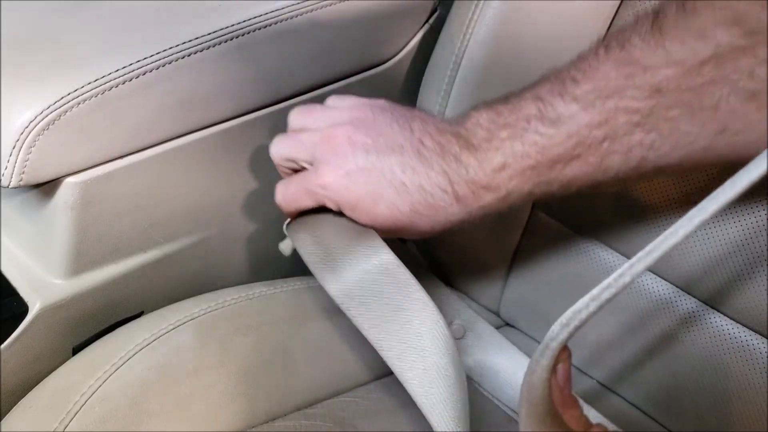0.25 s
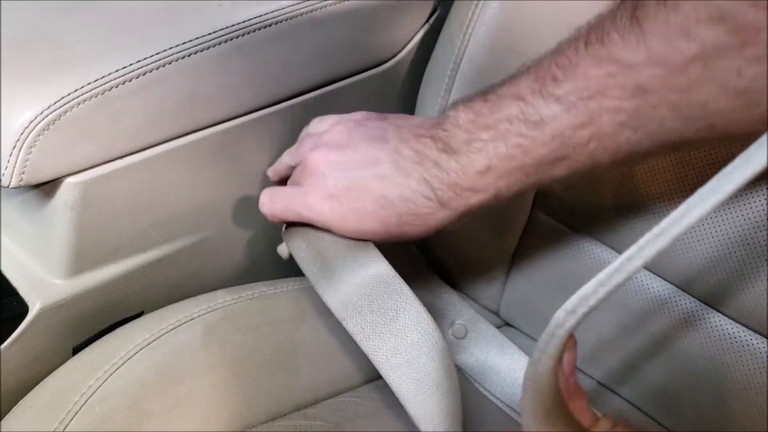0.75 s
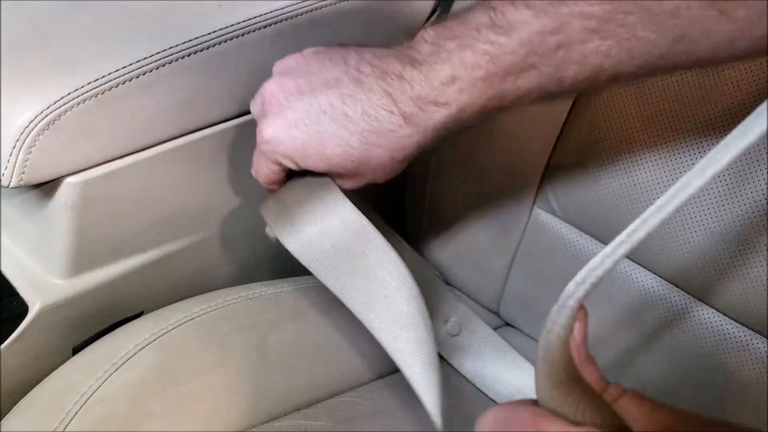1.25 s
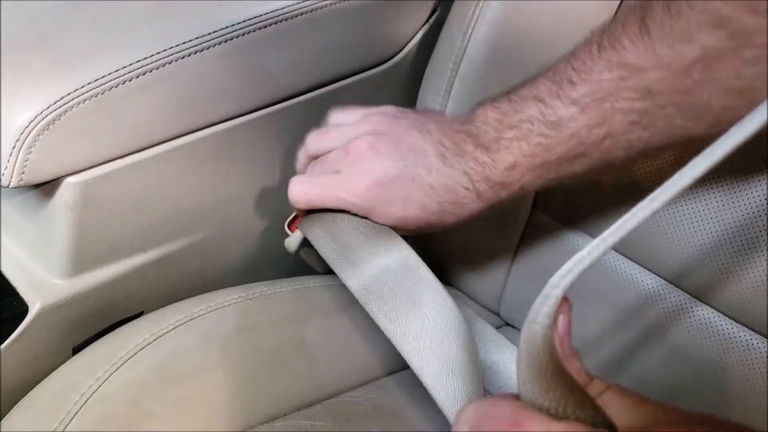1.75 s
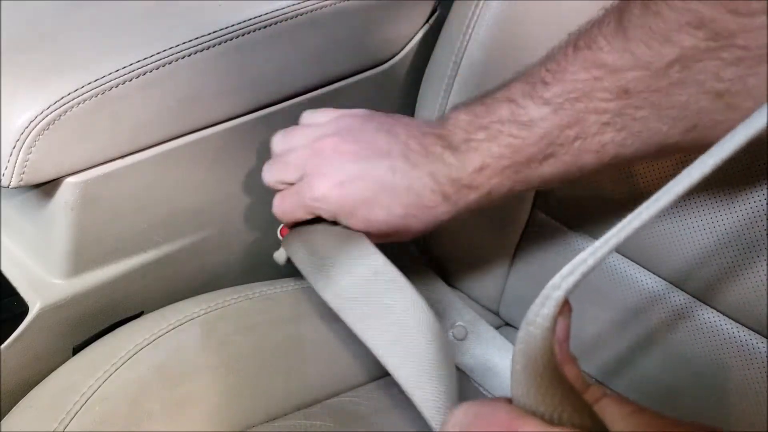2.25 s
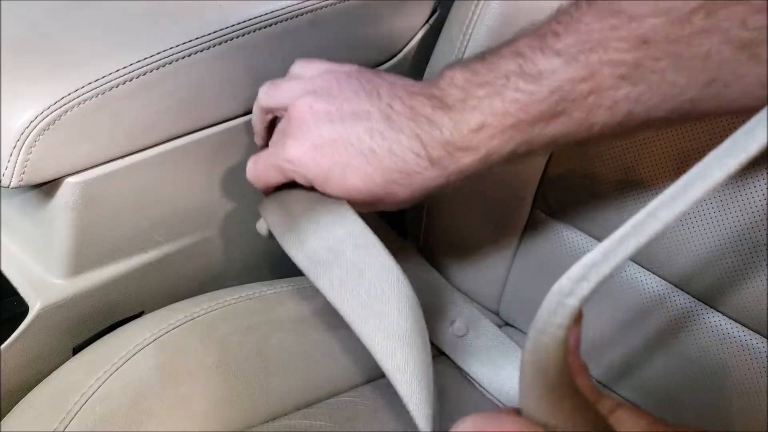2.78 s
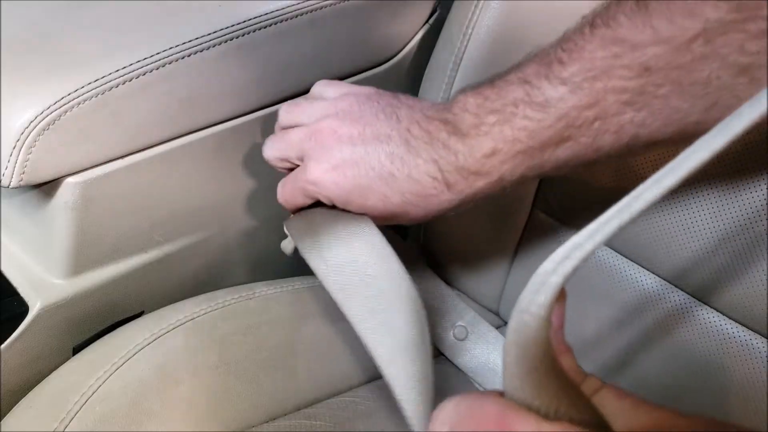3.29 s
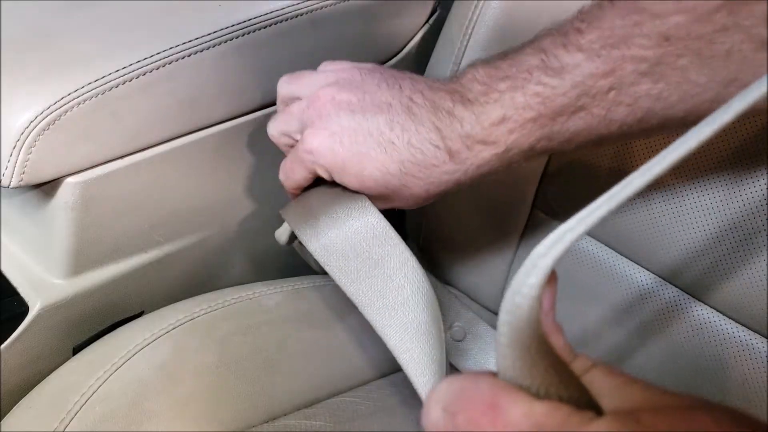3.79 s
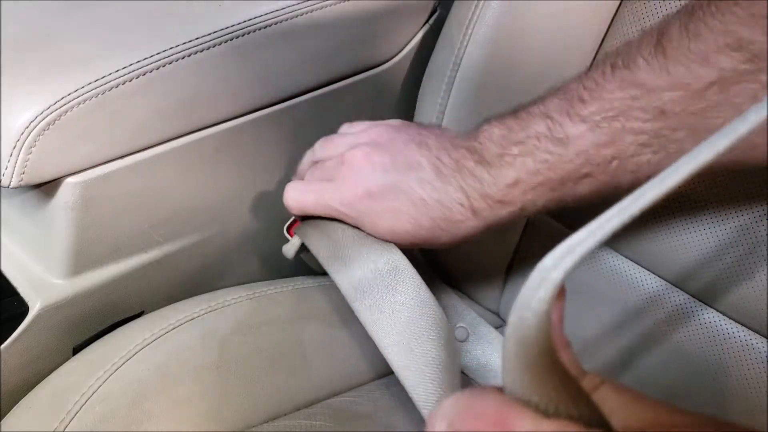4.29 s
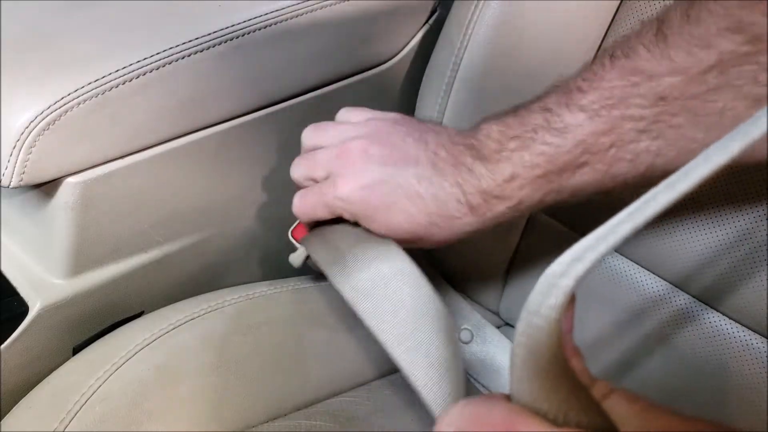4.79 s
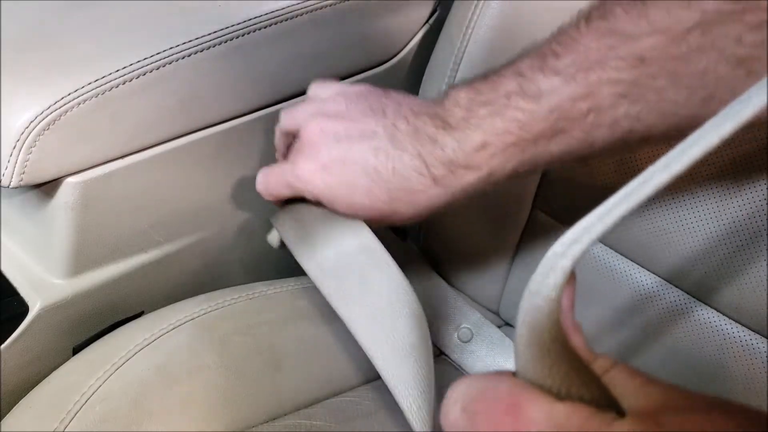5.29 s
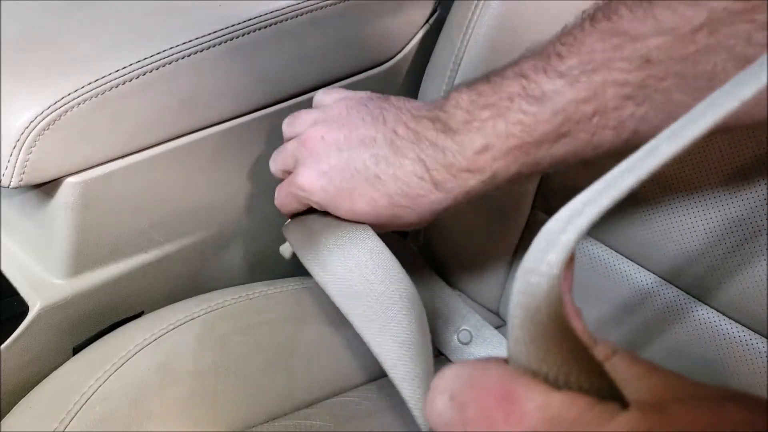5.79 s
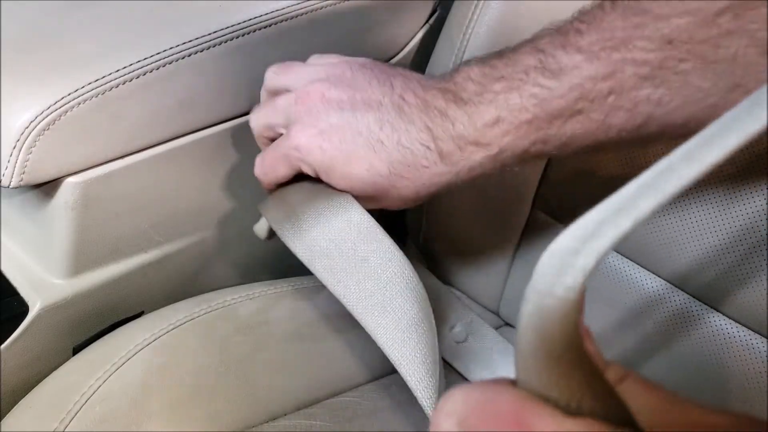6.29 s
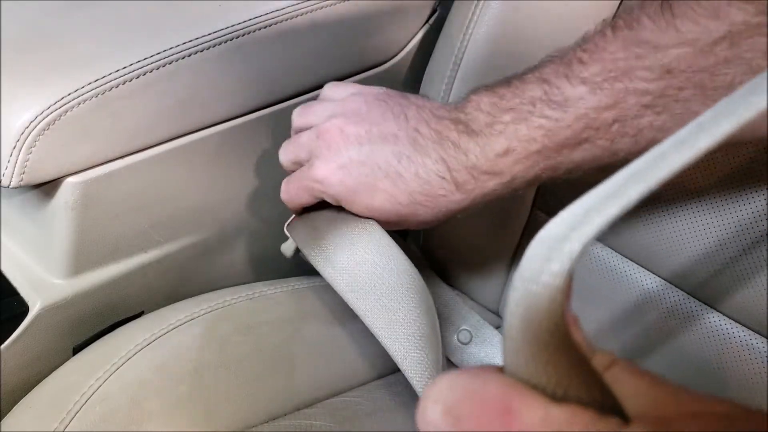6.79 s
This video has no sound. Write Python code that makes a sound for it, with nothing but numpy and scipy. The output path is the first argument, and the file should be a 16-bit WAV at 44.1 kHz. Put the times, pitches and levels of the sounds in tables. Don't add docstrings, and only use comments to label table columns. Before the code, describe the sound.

In a quiet parked car, heard very close in dry stereo slightly nearer on the left, a seat belt is fastened and freed eight times. A few dull taps and a webbing rub lead to the first sharp, bright snap at 0.34 seconds, with a rebound a few milliseconds later. A lighter button click follows at 0.54 and a hollow spring release at 0.76, then loose taps. Further snaps come at 1.43 (softest), 2.23, 3.08, 3.93, 4.76, 5.62 and 6.56, each followed by a press about 0.2 later and a release about 0.4 later; the 4.34 release is loudest. Strong scraping knocks precede the 4.76 snap, and a brief fabric rub accompanies 5.6. Low seat thuds and rumble follow the arm's shoves, calming while the hand holds still. Very faint metallic rings hang near 3.8, 4.8 and 6.9. The last release is at 6.97.

```python
import sys
import numpy as np
from scipy import signal
from scipy.fft import rfft, irfft, next_fast_len
from scipy.io import wavfile
from scipy.ndimage import uniform_filter1d, map_coordinates

SR = 44100
rng = np.random.default_rng(int(sys.argv[2]) if len(sys.argv) > 2 else 0)


def transcribe(u):
    v = np.clip(np.atleast_2d(u).T, -1, 1)
    q = np.round(v * 32767).astype(np.int16)
    wavfile.write(sys.argv[1], SR, q)


def rack_gain(trim_db):
    fader = np.asarray(trim_db, float)
    return 10 ** (fader / 20)


N = 310905

# t/s, peak level/dB, catch ahead/ms, catch level/dB, body level/dB
LATCHES = [
    (0.3389, -11.5, 6.9, -24.5, -6.5),
    (1.4343, -14, 8.1, -12.5, -10),
    (2.2342, -12, 4.8, -18.5, -2.5),
    (3.078, -11.5, 6, -20.5, 1),
    (3.9338, -10.5, 5.2, -20.5, -1),
    (4.7603, -10.5, 5.2, -15, -0.5),
    (5.6184, -13, 7.2, -17.5, -7.5),
    (6.558, -11, 7.4, -23.5, -2),
]
# t/s, peak level/dB, build-up/ms, body level/dB, shove level/dB
PRESSES = [
    (0.5427, -24, 2.7, 2, -53),
    (1.604, -25, 3.5, -1, -58.5),
    (2.4295, -25.5, 2.3, -1.5, -57),
    (3.267, -23, 3.45, 2.5, -57),
    (4.1159, -22, 3.9, 3.5, -51.5),
    (4.9777, -24, 3.2, 7, -57.5),
    (5.8076, -23, 2.9, 6, -53),
    (6.732, -20, 2.7, 4, -52.5),
]
# t/s, peak level/dB, pawl ahead/ms, pawl level/dB, brightness/dB
RELEASES = [
    (0.7577, -17.5, 11.2, -31, -0.6),
    (1.8024, -20.5, 12, -27, -0.8),
    (2.6389, -20.5, 11.3, -27, 0.5),
    (3.5267, -17, 16.3, -32, -1.2),
    (4.3434, -13, 9.9, -24, -3),
    (5.2186, -15.5, 9.4, -24.5, -3),
    (6.0747, -16, 8.9, -26, -1.5),
    (6.9724, -19.5, 14, -26.5, -0.3),
]


def unit(x):
    return x / np.sqrt(np.mean(x ** 2) + 1e-20)


def along(points, hz):
    f, v = np.transpose(points)
    return np.interp(np.log(hz + 1), np.log(f + 1), v)


def filtered(x, response):
    m = next_fast_len(N + SR // 2, True) // 2 * 2
    return irfft(rfft(x, m) * response(np.fft.rfftfreq(m, 1 / SR)), m)[..., :N]


def coloured(x, points):
    return filtered(x, lambda hz: rack_gain(along(points, hz)))


def causal(gain):
    cepstrum = irfft(np.log(gain + 1e-5))
    half = len(cepstrum) // 2
    cepstrum[1:half] *= 2
    cepstrum[half + 1:] = 0
    return np.exp(rfft(cepstrum)) / np.sqrt(np.mean(gain ** 2))


def resonant(modes, f):
    total = 0
    for k, (centre, width, db) in enumerate(modes):
        total = total + (-1) ** k * rack_gain(db) * 1j * f * width / (centre ** 2 - f * f + 1j * f * width)
    return total


def pair(alike, size):
    a, b = rng.standard_normal((2, size))
    angle = np.arccos(np.clip(alike, 0, 1)) / 2
    return np.array([np.cos(angle) * a + np.sin(angle) * b, np.cos(angle) * a - np.sin(angle) * b])


def wobble(rate):
    knots = rng.standard_normal(int(N * rate / SR) + 4)
    return map_coordinates(knots, [np.arange(N) * rate / SR])


def span(start_s, end_s, edge_s=0.046):
    now = np.arange(N) / SR
    return (np.tanh((now - start_s) / edge_s) - np.tanh((now - end_s) / edge_s)) / 2


def holding_still():
    settle_s = 0.074
    return sum(span(press[0] + settle_s, release[0]) for press, release in zip(PRESSES, RELEASES))


def seat_rumble(still):
    # f/Hz, level/dB
    rumble_colour = [(12, -44), (25, -15.5), (50, -5.5), (180, -5.5), (250, -13.5), (370, -10),
                     (560, -19.5), (800, -26.5), (1500, -31), (3000, -120)]
    starts = np.array([row[0] for row in [*LATCHES, *RELEASES]])
    after = np.maximum(np.arange(N) / SR - starts[:, None], 0)
    rise, fall = 1 - np.exp(-after / 0.0093), np.exp(-(after / 0.09) ** 2)
    load = np.sum(rise * fall, axis=0)
    low = coloured(rack_gain(3 * wobble(18)) * pair(0.7, N), rumble_colour)
    return rack_gain(-69.5 + 8.5 * load - 5.3 * still) * unit(low)


def webbing(still):
    # f/Hz, level/dB
    weave_colour = [(500, -28.5), (1500, -12), (2300, -4), (4500, -5.5), (7500, -5.5), (9200, -17.5),
                    (11500, -4), (13000, -14), (15800, -5.5)]
    # f/Hz, level/dB
    airy_colour = [(7000, -38), (9500, -13.5), (11500, 0.5), (13000, -5.5), (15800, -5)]
    # start t/s, length/s, slide level/dB, airy level/dB
    strokes = [(-0.1, 0.3, -67, -67), (1.414, .08, -73, -82), (1.83, 0.35, -70, -65.5),
               (2.249, 0.18, -65, -68.5), (3.95, 0.12, -74.5, -69), (4.139, 0.48, -79.5, -72.5),
               (4.6, 0.31, -75, -69), (5.341, 0.092, -71.5, -78), (5.597, 0.067, -49.5, -73),
               (6.158, 0.097, -75, -77.5), (6.434, 0.18, -67.5, -80), (6.57, 0.35, -79.5, -69)]
    slide, taut = sum(rack_gain(levels_db)[:, None] * span(s, s + length) for s, length, *levels_db in strokes)
    idle = rack_gain(-80 - 11.5 * still)
    grains = rack_gain(3 * wobble(48) + 1.2 * wobble(360)) * pair(0.21, N)
    rub = (idle + slide) * unit(coloured(grains, weave_colour))
    return rub + taut * rack_gain(1.5 * wobble(20)) * unit(coloured(pair(0.24, N), airy_colour))


def hand():
    still = holding_still()
    return webbing(still) + seat_rumble(still)


def shoves():
    # t/s, cushion level/dB, frame above the cushion/dB
    nudges = [(0.085, -63.5, -1), (0.226, -53, -9), (0.874, -54, -6), (0.929, -53, -9), (1.192, -56, -24),
              (1.261, -54.5, -3), (1.332, -55.5, -7), (1.878, -61.5, 0.5), (1.977, -62, -7),
              (2.754, -60.5, -8), (2.817, -49, -14), (2.999, -59.5, 0), (3.627, -58.5, -1),
              (3.718, -48, -9), (4.483, -56.5, -6.5), (4.636, -51, -6), (4.72, -47.5, 0), (5.342, -58.5, 1),
              (5.383, -57.5, -7), (5.492, -47, -3), (6.256, -56.5, -15), (6.412, -53, -10.5)]
    # t/s, cushion level/dB, frame above the cushion/dB
    thrusts = [
        (0.332, -45, -5),
        (1.416, -50, 6.5),
        (2.23, -44.5, 0),
        (3.072, -47, -1.5),
        (3.924, -45, 4.5),
        (4.758, -42, 0.5),
        (5.612, -43.5, 0.5),
        (6.548, -47.5, -4),
    ]
    heaves = [
        -42.5,
        -42,
        -45,
        -44.5,
        -42.5,
        -43.5,
        -39,
        -48,
    ]
    rows = [*nudges, *thrusts]
    rows += [(s, db, -10) for s, *_, db in PRESSES]
    ahead_s = 0.0027
    return rows + [(release[0] - ahead_s, db, -10) for release, db in zip(RELEASES, heaves)]


def seat():
    # f/Hz, width/Hz, level/dB
    cushion_modes = [(111, 18, -8), (183.7, 23.6, 2.5)]
    # f/Hz, width/Hz, level/dB
    frame_modes = [(325, 60, 1), (456, 76, -4), (521, 31, -6), (670, 130, -18)]
    t = np.arange(SR // 5) / SR
    soft, hard = np.zeros((2, 2, N + SR))
    for s, db, frame_db in shoves():
        start = round(s * SR)
        at = slice(start, start + len(t))
        soft[:, at] += rack_gain(db + 29 - 60 * t / 0.13) * (1 - np.exp(-t / 0.0063)) * pair(0.98, len(t))
        hard[:, at] += rack_gain(db + frame_db + 26.5 - 60 * t / 0.14) * (1 - np.exp(-t / 0.0014)) * pair(0.86, len(t))
    cushion = filtered(soft, lambda hz: resonant(cushion_modes, hz))
    return cushion + filtered(hard, lambda hz: resonant(frame_modes, hz))


def tongue():
    # t/s, f/Hz, level/dB, 60 dB decay/s
    rings = [
        (3.81, 4370, -68, 0.38),
        (4.829, 4520, -70, 0.94),
        (6.87, 4300, -71, 0.73),
    ]
    ringing = np.zeros(N)
    for s, hz, db, t60 in rings:
        t = np.maximum(np.arange(N) / SR - s, 0)
        swell = rack_gain(db - 60 * t / t60 + 3.5 * wobble(51)) * (1 - np.exp(-t / 0.02))
        ringing += swell * np.sin(2 * np.pi * hz * t + 3.1 * wobble(300))
    return ringing


def contacts():
    # t/s, peak level/dB
    rattles = [(0.022, -46), (0.466, -43), (0.488, -41.5), (0.6988, -46.5), (0.8214, -48), (1.1025, -44.5),
               (1.1196, -48.5), (1.304, -43), (1.6514, -49.5), (1.7075, -65), (1.9574, -39), (2.094, -49),
               (2.1697, -73), (2.691, -39.5), (2.7155, -47), (2.9162, -45.5), (3.225, -54), (3.3596, -56),
               (3.49, -66), (4.085, -46), (4.9396, -55), (5.161, -51.5), (5.349, -40), (5.762, -53),
               (6.283, -36.5), (6.384, -77), (6.4384, -47)]
    # t/s, peak level/dB, body level/dB
    rebounds = [
        (0.3454, -14, -3.5),
        (1.4405, -27, -8),
        (2.2412, -12.5, -9.5),
        (3.0822, -22, -4.5),
        (3.942, -13, -5.5),
        (4.7693, -13.5, -3.5),
        (5.6263, -13, -5.5),
        (6.565, -16, -3),
    ]
    # t/s, peak level/dB, build-up/ms, body level/dB
    slips = [(0.7183, -37, 5.2, -8), (0.7347, -34, 0.99, -7), (0.751, -24, 0.75, -5),
             (1.7684, -38, 0.62, 0), (1.775, -31, 4.3, -6), (1.797, -18.5, 1.6, -32),
             (1.8113, -27, 0.92, -17), (2.6498, -36.5, 0.71, 0), (3.504, -41.5, 1.1, -3),
             (3.532, -25.5, 1.4, -3.5), (4.311, -27.5, 2.8, -14), (4.3475, -25, 1.34, -1),
             (5.176, -38.5, 0.91, -6.5), (5.188, -42.5, 1, 1), (5.197, -36.5, 4.2, 1.5),
             (6.0305, -46.5, 0.78, -2.5), (6.056, -33.5, 6, -0.5), (6.9536, -40, 8.2, -3.5)]
    # t/s, peak level/dB, brightness/dB, build-up/ms, body level/dB
    taps = [(0.038, -35, 3, 1, 4), (0.0744, -32.5, -10, 1.6, -4), (0.0831, -21.5, -2.5, 4.7, -5),
            (0.805, -36, 0, 1.7, 5), (0.8708, -30.5, -5.5, 7.3, -2.5), (0.881, -27, -6, 0.19, -7),
            (0.9348, -25.5, -4, 15, 0), (1.1926, -28.5, -3, 5.5, -4), (1.8476, -31, 0, 1.6, 2),
            (1.874, -40, -10, 1, 6), (1.8993, -32.5, -5.5, 2.7, -2.5), (1.921, -35.5, -8, 6.5, -8),
            (1.9783, -27.5, -1.5, 3.8, 1.5), (2.755, -27, 0, 2.1, -3), (2.8182, -25, -8, 4.8, -10),
            (2.8246, -26, 0, 2.5, 0), (3.6337, -24, 0, 0.71, 1.5), (3.71, -34, -11, 3, -2),
            (3.7206, -28, -4.5, 4.5, 4), (3.7243, -28, 3.5, 1.9, 3.5), (4.4689, -32.5, -7, 2.6, 0),
            (4.482, -34, -3, 1.8, -2.5), (4.505, -27, -27, 2.1, -13), (4.5132, -22.5, 1.5, 0.41, -13.5),
            (4.5183, -34.5, -9.5, 1, 13.5), (5.2496, -36, -1, 2.3, 2), (5.3343, -32, -3.5, 0.87, 0),
            (5.3885, -24, -4.5, 5, -5.5), (6.137, -31, 0, 0.2, 6), (6.1989, -32, -2.5, 2.5, -2),
            (6.235, -29, -13, 0.67, -1), (6.2434, -20, -0.5, 1.7, -5)]
    # t/s, peak level/dB, brightness/dB, build-up/ms, body level/dB
    entries = [(0.2254, -31.5, -7, 1.4, 2), (0.26, -30.5, -4.5, 1.2, -2.5), (0.3041, -41, -9.5, 0.8, 1.5),
               (0.3205, -41, -11.5, 0.71, -4.5), (1.241, -42, -16.5, 0.93, 2),
               (1.2616, -41, -22.5, 3, -0.5), (1.334, -39.5, -9.5, 1.3, -2.5), (1.401, -49, -10.5, 5.5, 1),
               (1.4126, -40.5, -4.5, 4, 3.5), (2.115, -41, -5.5, 0.56, 0.5), (2.2167, -46, -7, 5.5, -1.5),
               (3.0036, -28.5, -5, 1.9, -0.5), (3.02, -32, -6, 0.72, 0.5), (3.885, -32.5, -2.5, 1.5, -4.5),
               (3.913, -28.5, -8, 1.1, 7.5), (4.636, -36, -4, 0.96, 0.5), (4.7187, -18, -1.5, 1.8, 1.5),
               (4.7319, -15.5, -1.5, 2.6, -8.5), (4.739, -17, -6.5, 2.9, -1),
               (4.7488, -33.5, -0.5, 1.5, -4), (5.4859, -35, -14, 1, -5.5), (5.4944, -40, -0.5, 3.2, 2.5),
               (5.536, -45, -9.5, 0.9, -3), (5.544, -39, -2.5, 1.2, -2), (6.4047, -36.5, -15, 0.68, 2.5),
               (6.468, -39, -8.5, 2.4, 0.5), (6.476, -40.5, -4, 3.7, -1), (6.527, -33, -17, 1.7, -2.5)]
    # t/s, peak level/dB, brightness/dB, knock level/dB, body level/dB
    ticks = [(0.068, -47, -3, -2, -7), (0.5058, -47, -3, -5, 3), (0.5873, -54, -11, -9.5, 5),
             (0.9595, -47, -9, -13, 8), (1.076, -38, -18, 0.5, -1), (1.5599, -35.5, -7.5, -17, 3.5),
             (1.5654, -37.5, -7, -17, -7), (1.968, -51, -13, -19, -1), (2.303, -42, -10, -15, 7),
             (2.355, -41, -8, -17, 6), (2.3722, -48, -6, -20, 5), (2.386, -47.5, 2, -10, 6),
             (2.423, -33, -3, -23, 6), (2.7398, -47, -7, -6, 4), (2.868, -43, -26, -15, -1),
             (2.9893, -52.5, -10.5, -15.5, 0.5), (3.0594, -51.5, -6, -19.5, -2),
             (3.1268, -34.5, -1.5, -9, -6), (3.1602, -43, -4.5, -10, 9), (3.578, -41, -9, -10, 3),
             (3.785, -41, -17.5, -11, 4), (4.0315, -45, -5, -14, 13), (4.0755, -48, -10, -9, 15),
             (4.0992, -47, -1, -6, -1), (4.4265, -51, -10, -11, 4), (4.4345, -41, -7, -13, 1),
             (4.7072, -55, -10.5, -16.5, 4.5), (5.2953, -48, -8, -5, 4), (5.3223, -41, -18, -3, -3),
             (5.3738, -37, -16, -4.5, -5), (5.7184, -44.5, -34, -28, 3), (5.78, -65, -17, -22, 1),
             (6.0232, -62, -10, -21, -5), (6.09, -26, -15, -31, -10), (6.186, -50, -12, -9, 4),
             (6.215, -30.5, -19, -19, -8), (6.7021, -55, -6.5, -15, 10), (6.709, -49.5, -8, -15, 12),
             (7.041, -59, -10, -13, -2)]
    rows = [(s + 0.0028, db - 3.5, -12, -11, 1.1, 3.5) for s, db in rattles]
    for s, db, ahead_ms, catch_db, body_db in LATCHES:
        rows.append((s - ahead_ms / 1000, catch_db, -0.5, -12.5, 3, 0.5))
        rows.append((s, db, -0.89, -18.5, 0.68, body_db))
    rows += [(s, db, -2.3, -20, 1, body_db) for s, db, body_db in rebounds]
    for s, db, ahead_ms, pawl_db, bright_db in RELEASES:
        rows.append((s - ahead_ms / 1000, pawl_db, 1.5, -9, 3.7, 1.5))
        rows.append((s, db, bright_db, -18, 2.5, -3))
    rows += [(s, db, -0.5, -19, rise_ms, body_db) for s, db, rise_ms, body_db, _ in PRESSES]
    rows += [(s, db, -5.5, -13, rise_ms, body_db) for s, db, rise_ms, body_db in slips]
    for s, db, bright_db, rise_ms, body_db in [*taps, *entries]:
        rows.append((s, db, bright_db, -14.5, rise_ms, body_db))
    return rows + [(*tick, 0.41, body_db) for *tick, body_db in ticks]


def strike(t, rise_s):
    size = len(t)
    slow_clumps = unit(uniform_filter1d(rng.standard_normal(size), size=14))
    clumps = rack_gain(5 * slow_clumps + 2 * rng.standard_normal(size))
    after = np.maximum(t, 0)
    first_touch = np.clip((t + 2.4 * rise_s) / 0.0008, 0.003, 1)
    build = np.exp(1.25 * np.minimum(t, 0) / rise_s) * first_touch
    shape = build * np.exp(-(after / 0.0024) ** 2)
    chatter = clumps * shape * pair(0.72, size)
    chatter *= np.linalg.norm(shape) / np.linalg.norm(chatter[0])
    flutter = rack_gain(2 * unit(uniform_filter1d(rng.standard_normal(size), size=60)))
    quick = rack_gain(-6 - 60 * after / 0.078) * flutter
    slow = rack_gain(-34 - 60 * after / 0.47) * (1 - after / after[-1])
    arrives = 1 - 0.31 * np.exp(-(after / 0.0017) ** 2)
    return chatter, (quick + slow) * arrives * build * pair(0.026, size)


def buckle_colour(hz):
    # f/Hz, level/dB
    housing_colour = [(350, -24), (600, -21), (1030, -13), (1520, -10), (1790, -12.5), (2120, -0.5),
                      (2720, -1.5), (4740, -0.5), (5220, -2.5), (6610, -1.5), (8840, -6.5), (15000, 2.5),
                      (15800, -11), (16500, -20.5)]
    return causal(rack_gain(along(housing_colour, hz)))


def buckle():
    # f/Hz, width/Hz, level/dB
    shell_modes = [(1135, 70, -2), (2085, 90, 2), (2395, 70, 0), (4740, 120, 0), (6210, 100, 0),
                   (6740, 120, -1), (7550, 100, -2), (14800, 120, -5)]
    ahead = SR // 50
    t = (np.arange(SR // 5) - ahead) / SR
    hz = np.fft.rfftfreq(len(t), 1 / SR)
    upper = 1 / (1 + (7500 / (hz + 1)) ** 8)
    knock = 1 / (1 + (hz / 1700) ** 8)
    body = 1 / (1 + (1900 / (hz + 1)) ** 12) / (1 + (hz / 3240) ** 8)
    peaks = sum(np.abs(resonant([mode], hz)) for mode in shell_modes)
    upholstery = rack_gain(-3 / (1 + (9000 / (hz + 1)) ** 4))
    near = causal(1 + 0.63 * peaks)
    far = causal(1 + 0.29 * peaks) * upholstery
    crack = np.zeros((2, N + SR))
    for s, db, bright_db, knock_db, rise_ms, body_db in contacts():
        start = round(s * SR)
        spot_db = 3 * np.interp(hz, np.linspace(0, SR / 2, num=130), rng.standard_normal(130))
        blow_db = db - 5 + (bright_db + 0.5) * upper + (knock_db + 17) * knock + body_db * body
        colour = causal(rack_gain(spot_db)) * rack_gain(blow_db)
        chatter, cabin = rfft(strike(t, np.clip(rise_ms, 0.2, 6) / 1000))
        crack[:, start:start + len(t)] += irfft((chatter * near + cabin * far) * colour, len(t))
    return filtered(crack[:, ahead:][:, :N], buckle_colour)


def scene():
    # f/Hz, level/dB
    port_tilt = [(60, 3.5), (240, -1), (950, 1.5), (3770, 2), (15000, 5.5)]
    side = np.array([[0.5], [-0.5]])

    def ports(hz):
        lead = 2 * np.pi * hz * 0.000095
        turn = 1.99 * hz ** 2 / (hz ** 2 + 1300 ** 2)
        return rack_gain(side * along(port_tilt, hz)) * np.exp(1j * side * (lead + turn))

    return filtered(buckle() + tongue() + seat() + hand(), ports)


def band_limit(x):
    return signal.sosfilt(signal.butter(12, 16810, fs=SR, output="sos"), x)


def record(dry):
    # f/Hz, level/dB
    hiss_colour = [(600, -5), (2200, 0.5), (4000, 0), (7300, -1), (9000, -18.5), (15500, -10)]
    hiss = rack_gain(-83.5) * unit(coloured(pair(0, N), hiss_colour))

    def band(hz):
        dip = 1 - 0.25 / (1 + (14000 / (hz + 1)) ** 16)
        return dip / (1 + (hz / 15700) ** 120)

    return band_limit(filtered(dry + hiss, band))


dry = scene()
out = record(dry)
transcribe(out)
```